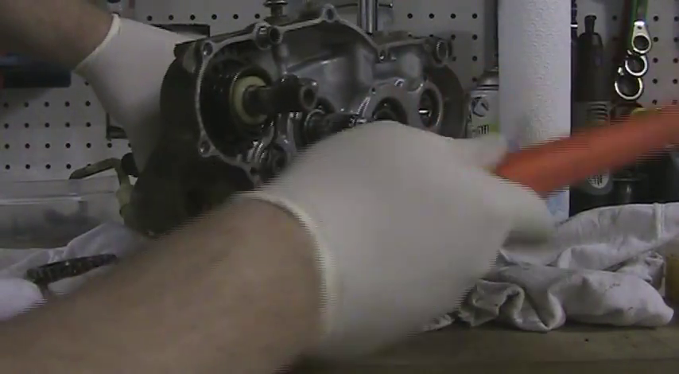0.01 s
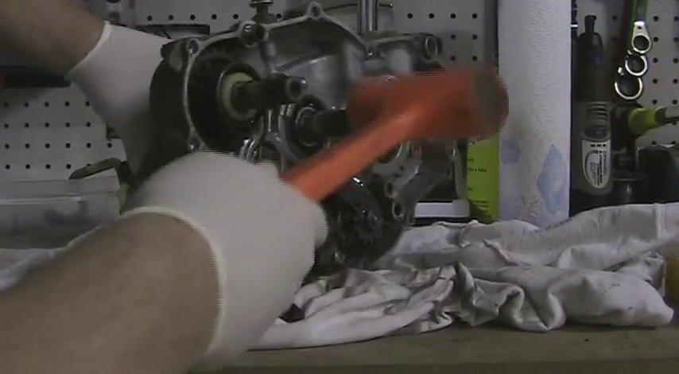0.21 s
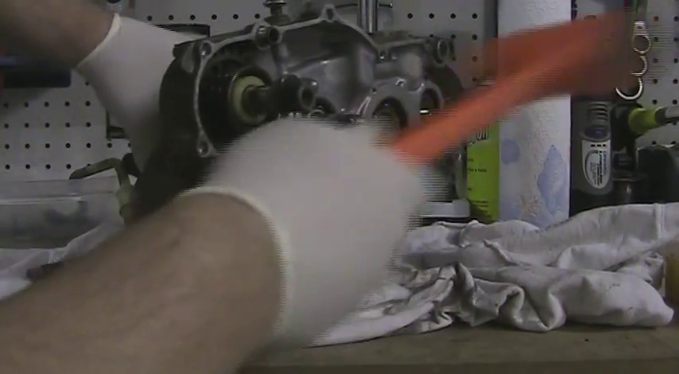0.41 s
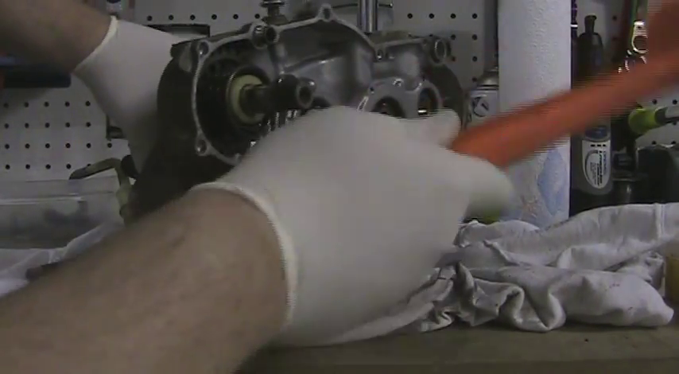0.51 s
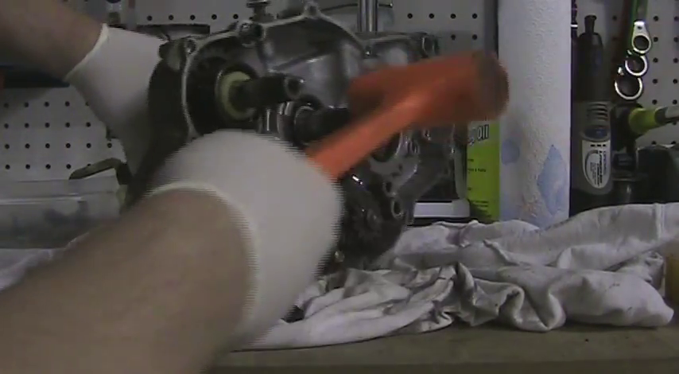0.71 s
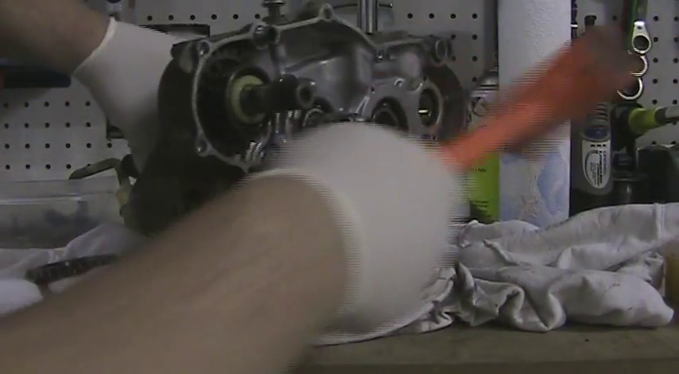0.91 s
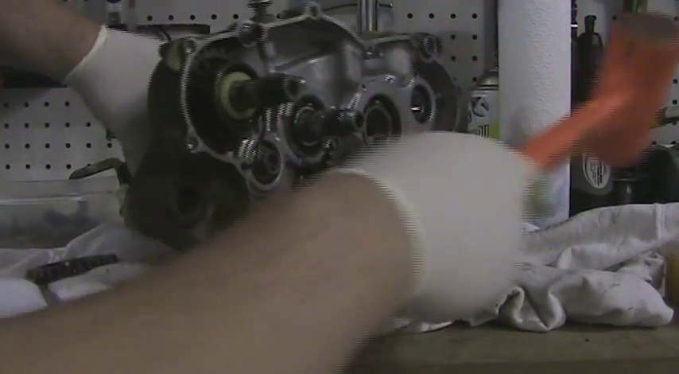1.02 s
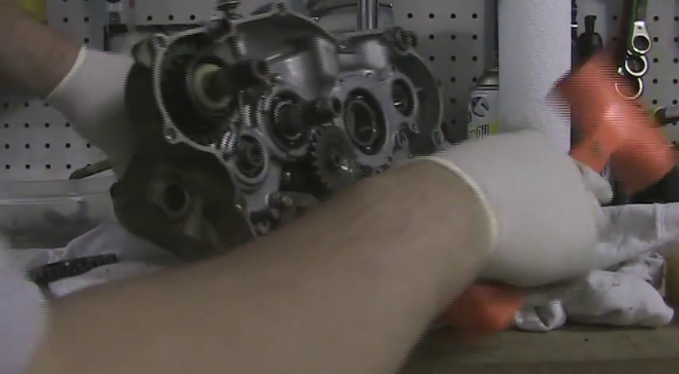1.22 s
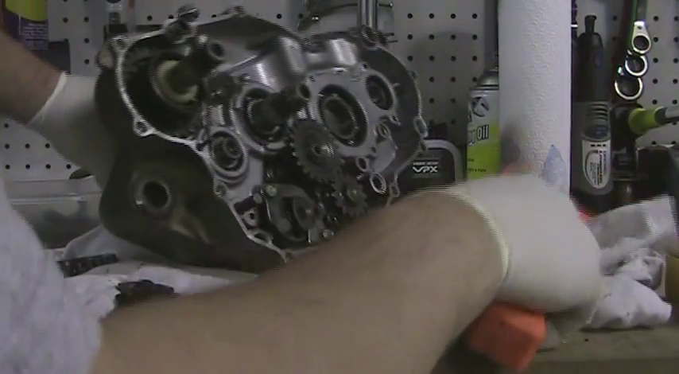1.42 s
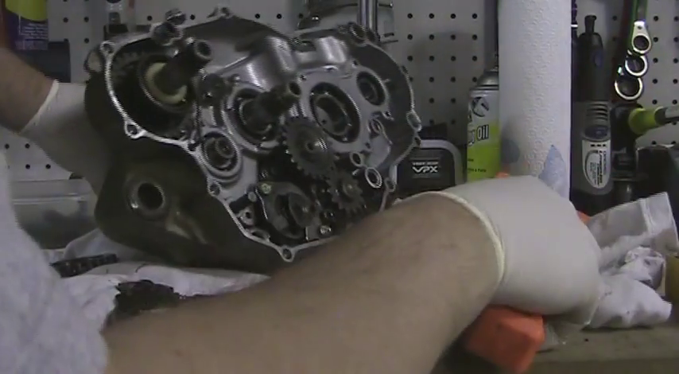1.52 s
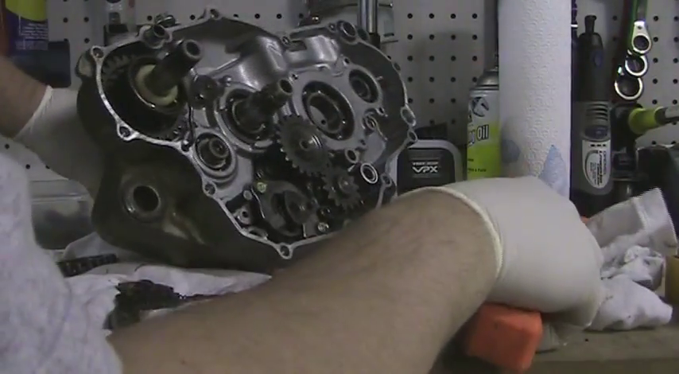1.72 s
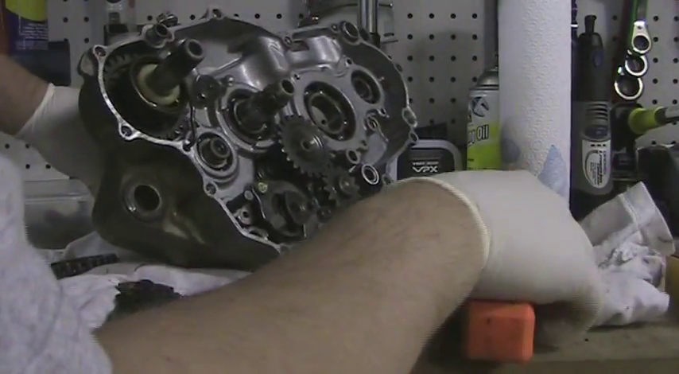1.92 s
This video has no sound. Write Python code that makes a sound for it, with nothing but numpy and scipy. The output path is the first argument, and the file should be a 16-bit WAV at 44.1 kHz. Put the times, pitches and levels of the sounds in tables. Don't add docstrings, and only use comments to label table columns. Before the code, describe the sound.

Mallet blows ring sharply on a metal engine casing, then the mallet is laid on a wooden bench

```python
import sys
import numpy as np
from scipy import signal
from scipy.io import wavfile

SR = 44100
rng = np.random.default_rng(int(sys.argv[2]) if len(sys.argv) > 2 else 0)


def transcribe(signal):
    frames = np.atleast_2d(signal).T
    limited = np.clip(frames, -1, 1)
    pcm = np.round(limited * 32767).astype(np.int16)
    wavfile.write(sys.argv[1], SR, pcm)


def volts_from_db(level):
    exponent = np.asarray(level, float) / 20
    return 10 ** exponent


N = 88200
PRE = SR // 2


def in_hz(points, hz):
    table = np.array(points)
    return np.interp(np.log(hz), np.log(table[:, 0]), table[:, 1])


def spot(s):
    return int(round(s * SR)) + PRE


def filtered(x, order, hz, kind):
    return signal.sosfilt(signal.butter(order, hz, kind, fs=SR, output="sos"), x)


def ring(clicks, hz, t60):
    r = volts_from_db(-60 / (t60 * SR))
    w = 2 * np.pi * hz / SR
    return signal.lfilter([0, np.sin(w)], [1, -2 * r * np.cos(w), r * r], clicks + 1e-18)


def banded(likeness, shape):
    out = 0
    edges = 25 * 2 ** np.arange(0, 9.6, 0.5)
    white = rng.standard_normal((2, 2, N + PRE))
    for k, (low, high) in enumerate(zip(edges, edges[1:])):
        hz = np.sqrt(low * high)
        mid, side = filtered(white[k % 2], 2, [low, high], "band")
        alike = np.clip(in_hz(likeness, hz), 0, 1)
        stereo = np.sqrt(1 + alike) * mid + np.sqrt(1 - alike) * side * [[1], [-1]]
        out = out + shape(hz) * stereo
    return out


def blows():
    # time in seconds, force in dB, brightness in dB per octave.
    strikes = [
        (-.275, 6, 0.1),
        (0.225, 6, -0.1),
        (0.7207, 4.5, -0.4),
    ]
    # pitch in Hz, level in dB, time to fall 60 dB in seconds.
    casing = [(432, -18.5, 0.069), (670, -3, 0.015), (826, 4, 0.0095), (1267, -24, 0.068),
              (1569, -3.5, .022), (1910, -7, 0.02), (2720, -17.5, 0.045), (3128, -7, 0.026),
              (3810, -5.5, 0.013), (4370, -19.5, 0.0075), (5550, -11, 0.014), (6730, -14, 0.014),
              (7890, -12.5, 0.01), (10000, -16.5, 0.0077)]
    lead, lead_db = int(0.0035 * SR), -46
    chatter_per_s, chatter_t60_s, chatter_db = 2000, 0.037, -16.5
    clump_s, clump_spread_s, clump_db = 0.01, 0.002, -15.5
    tilt_db = 5
    out = np.zeros(N + PRE)
    t = np.arange(SR // 20) / SR
    for s, db, bright_db in strikes:
        when = rng.random(len(t)) < chatter_per_s / SR
        rattle = volts_from_db(chatter_db - 60 * t / chatter_t60_s)
        rattle = rattle + volts_from_db(clump_db) * np.exp(-((t - clump_s) / clump_spread_s) ** 2)
        for hz, level_db, t60 in casing:
            clicks = np.zeros(SR // 4)
            draw = rng.standard_normal(len(t))
            tilt = volts_from_db(tilt_db * np.log2(hz / 4000))
            clicks[:lead] = volts_from_db(lead_db) * tilt ** 2 * draw[-lead:] * np.linspace(0, 1, lead)
            clicks[lead:lead + len(t)] = when * draw * rattle * tilt
            clicks[lead] += 1
            i = spot(s) - lead
            level = volts_from_db(db + level_db + bright_db * np.log2(hz / 1000))
            out[i:i + len(clicks)] += level * ring(clicks, hz, t60)
    return filtered(out, 2, 330, "high")


def bench():
    # time in seconds, force in dB, treble limit of the contact in Hz.
    knocks = [
        (1.5195, -14.5, 497),
        (1.5240, -13, 1820),
        (1.5301, -10, 2460),
        (1.536, -11, 2600),
        (1.567, -22.5, 700),
        (1.655, -20.5, 696),
        (1.938, -40, 970),
    ]
    # pitch in Hz, level in dB, time to fall 60 dB in seconds.
    modes = [(144, -8, 0.058), (213, -5.5, 0.045), (309, 1, 0.026), (420, -5, 0.015), (685, -13, 0.1),
             (886, -12, 0.079), (1235, -14, 0.054), (1611, -11, 0.04), (2340, -27, 0.024),
             (2917, -15, 0.046), (4200, -12.5, 0.023), (6200, -20, 0.012)]
    out = np.zeros(N + PRE)
    for s, db, cut_hz in knocks:
        push = np.zeros(SR // 3)
        spread_db = rng.normal(0, 2, len(modes))
        push[0] = 1
        push = filtered(push + 1e-18, 2, cut_hz, "low")
        body = 0
        for k, (hz, level_db, t60) in enumerate(modes):
            body = body + (-1) ** k * volts_from_db(level_db + spread_db[k]) * ring(push, hz, t60)
        part = out[spot(s):spot(s) + len(body)]
        part += volts_from_db(db) * body[:len(part)]
    return out


def rocking():
    # time in seconds, level in dB.
    rocks = [
        (1.922, -35),
        (1.934, -43.5),
        (1.976, -35),
    ]
    push = np.zeros(N + PRE)
    for s, db in rocks:
        push[spot(s)] = volts_from_db(db)
    push = filtered(push + 1e-18, 2, 210, "low")
    return ring(push, hz=141, t60=0.28)


def shot():
    # time of the peak in seconds, level in dB, rise in seconds, fall in seconds.
    slides = [
        (.15, -45.5, .025, .012),
        (.648, -46.5, .022, .010),
        (1.03, -58, .03, .03),
        (1.795, -55.5, .008, .006),
        (1.835, -49.5, .008, .012),
        (1.885, -53, 0.013, 0.02),
        (1.858, -55, 0.0074, 0.011),
        (1.97, -66.5, 0.054, 0.054),
    ]
    pellets_per_s, low_hz, high_hz = 12000, 4000, 12000
    t = (np.arange(N + PRE) - PRE) / SR
    level = 0
    for s, db, rise, fall in slides:
        level = level + volts_from_db(db) * np.exp(-((t - s) / np.where(t < s, rise, fall)) ** 2)
    hits = rng.random(len(t)) < pellets_per_s / SR
    grains = hits * rng.standard_normal(len(t)) * volts_from_db(2.7 * rng.exponential(1, len(t)))
    grains = filtered(grains, 3, [low_hz, high_hz], "band")
    return level * grains / grains.std()


def ticks():
    # time in seconds, peak in dB, pitch in Hz.
    tick_rows = [(1.045, -41, 10000), (1.089, -43, 8500), (1.267, -44.5, 11780), (1.298, -49, 7900),
                 (1.320, -34.5, 8370), (1.420, -44, 7000), (1.831, -22.5, 10000), (1.8405, -37, 12500),
                 (1.877, -49, 10000), (1.881, -35, 7850), (1.892, -33.5, 7160), (1.917, -41, 7550),
                 (1.922, -40.5, 6000)]
    out = np.zeros(N + PRE)
    click = np.eye(1, 400)[0]
    for s, db, hz in tick_rows:
        t60 = 6.3 / hz
        tick = ring(ring(click, hz, t60), hz, t60)
        out[spot(s):spot(s) + 400] += volts_from_db(db) * tick / np.abs(tick).max()
    return out


def room():
    # frequency in Hz, time to fall 60 dB in seconds.
    room_t60 = [(80, 0.72), (160, 0.45), (420, 0.71), (1100, 0.84), (2900, 0.83), (6000, 0.59),
                (10000, 0.22), (14000, 0.14)]
    # frequency in Hz, level in dB.
    wet_blow = [(50, -23), (150, -8), (400, -4), (800, -3.5), (2000, -11.5), (7000, -15.5), (10000, -20),
                (14500, -33)]
    wet_bench = [(29, -63), (50, -13), (314, 1.5), (570, -15), (674, -10), (1040, -13), (1170, -21.5),
                 (3580, -29), (15000, -71.5)]
    # time in seconds, late level in dB,
    # early scatter in dB, extra lows in dB per octave below 1000 Hz.
    from_blows = [
        (-.275, 0, 12.5, 0.9),
        (.2246, -2, 10, 1.1),
        (.7208, -3.5, 9.5, 1.26),
    ]
    from_knocks = [
        (1.523, -4.5, 7, 0.1),
        (1.93, -22.5, -19.5, 0.1),
        (1.965, -34, -24, 0.1),
    ]
    # frequency in Hz, likeness from 0 to 1.
    likeness = [(60, 0.1), (150, 0.8), (500, 0.95), (1200, 0.76), (3000, 0.42), (8000, 0.8), (14000, 0)]
    build_s, scatter_s, early_t60_s = 0.015, 0.0011, 0.068
    early_tilt_db, early_lows_db = 1, 6
    t = (np.arange(0, N + PRE, 8) - PRE) / SR

    def band(hz):
        power = 0
        octaves = np.log2(hz / 1000)
        for rows, colour in ((from_blows, wet_blow), (from_knocks, wet_bench)):
            for s, late_db, early_db, lows_db in rows:
                age = np.maximum(t - s, 0)
                late = volts_from_db(late_db - lows_db * min(octaves, 0) - 60 * age / in_hz(room_t60, hz))
                late = late * (1 - np.exp(-age / build_s))
                early_db = early_db + early_tilt_db * octaves + early_lows_db * min(octaves + 1, 0)
                early = volts_from_db(early_db - 60 * age / early_t60_s) * (1 - np.exp(-age / scatter_s))
                power = power + volts_from_db(2 * in_hz(colour, hz)) * (late ** 2 + early ** 2)
        return np.repeat(np.sqrt(power), 8)[:N + PRE]

    top = signal.cheby2(8, 40, 13600, fs=SR, output="sos")
    return signal.sosfilt(top, banded(likeness, band))


def sing(x):
    # pitch in Hz, width in Hz, level in dB.
    lines = [(326, 10, -8), (517.5, 28, -4.5), (598, 28, -3.5), (722, 24, -6.5), (905, 14.6, -6),
             (1047, 13, -13), (1205, 50, -4.5), (1606, 70, -7.5), (1854, 60, 0), (2807, 20, -9.5),
             (3626, 54, -0.5), (6810, 140, -0.5)]
    out = x.copy()
    for hz, width_hz, db in lines:
        r = np.exp(-np.pi * width_hz / SR)
        feed = np.array([1, 0, -1]) * (1 - r * r) / 2
        back = [1, -2 * r * np.cos(2 * np.pi * hz / SR), r * r]
        out += volts_from_db(db) * signal.lfilter(feed, back, x)
    return out


def floor():
    # frequency in Hz, level in dB per Hz.
    colour = [(15, -29), (25, 5.5), (199, -1), (305, -1.5), (409, -2.5), (716, -4), (1250, -8), (7450, -18),
              (14500, -28)]
    # frequency in Hz, likeness from 0 to 1.
    likeness = [(30, 0.1), (200, 0.5), (1000, 0), (5000, 0.2), (14000, 0)]
    hiss_db, whine_db, whine_hz = -53, -74, 15734
    hiss = banded(likeness, lambda hz: volts_from_db(in_hz(colour, hz)))
    whine = np.sin(2 * np.pi * whine_hz * np.arange(N + PRE) / SR)
    return volts_from_db(hiss_db) * hiss / hiss.std() + volts_from_db(whine_db) * whine


def scene():
    blow_pan = volts_from_db(np.array([[0.3], [-0.3]]))
    shot_pan = volts_from_db(np.array([[0.6], [-0.6]]))
    direct = blows() * blow_pan + bench() + rocking() + (shot() + ticks()) * shot_pan
    direct = filtered(direct, 2, 117, "high")
    return (direct + sing(room()) + floor())[:, PRE:]


def low_pass(x):
    return signal.sosfilt(signal.butter(12, 16270, fs=SR, output="sos"), x)


def record(dry):
    duck_above_db, duck_share, attack_s, release_db_per_s = -7, 0.31, 0.002, 160.5
    clip_top, clip_hard = 0.96, 6.0
    level_db = 20 * np.log10(np.abs(dry).max(axis=0) + 1e-9)
    over = np.maximum(level_db - duck_above_db, 0)
    ramp = release_db_per_s * np.arange(N) / SR
    held = np.maximum.accumulate(over + ramp) - ramp
    r = np.exp(-1 / (attack_s * SR))
    late = signal.lfilter([(1 - r) ** 2], [1, -2 * r, r * r], held)
    x = dry * volts_from_db(-duck_share * late) / clip_top
    x = clip_top * x / (1 + np.abs(x) ** clip_hard) ** (1 / clip_hard)
    mix = signal.lfilter(*signal.butter(1, 60, "high", fs=SR), x)
    return low_pass(mix)


dry = scene()
out = record(dry)
transcribe(out)
```